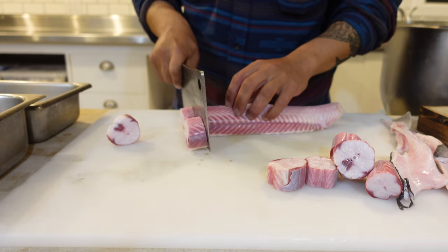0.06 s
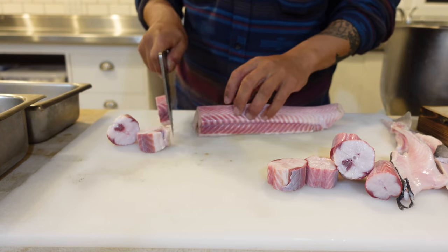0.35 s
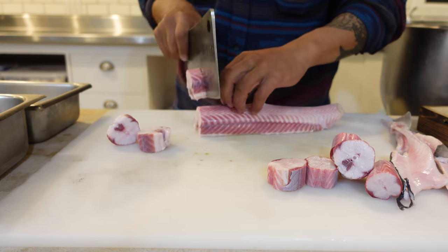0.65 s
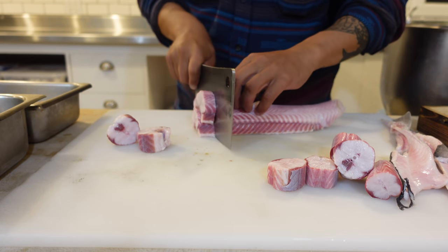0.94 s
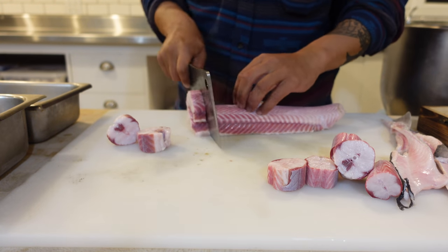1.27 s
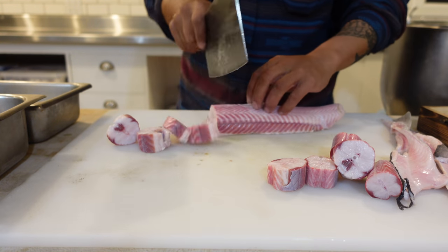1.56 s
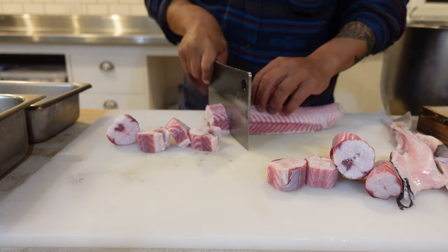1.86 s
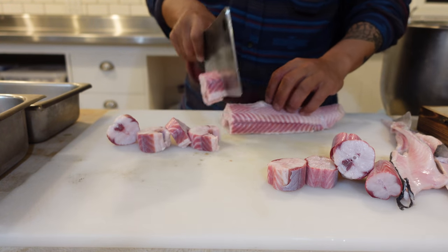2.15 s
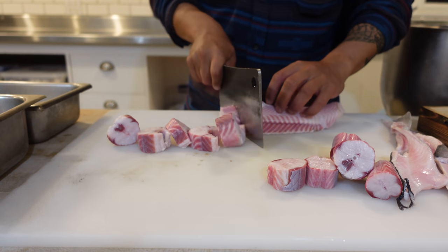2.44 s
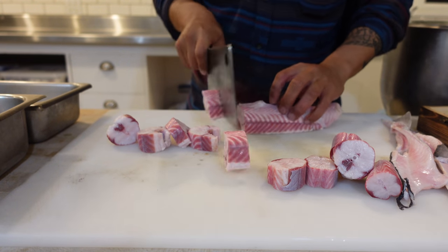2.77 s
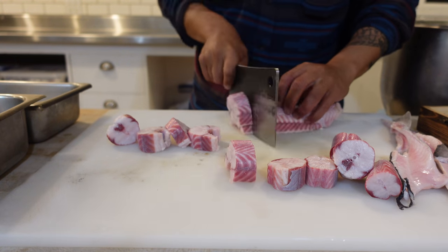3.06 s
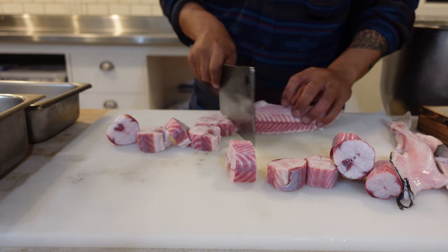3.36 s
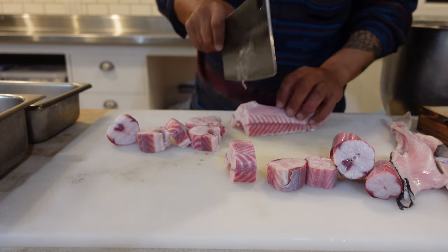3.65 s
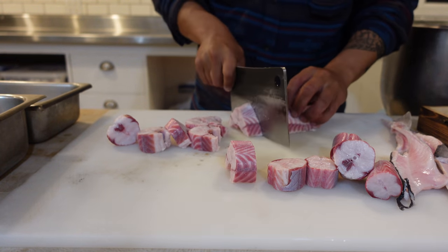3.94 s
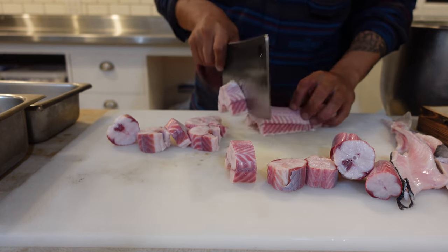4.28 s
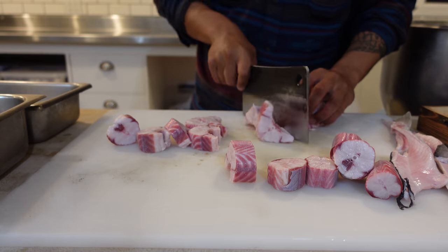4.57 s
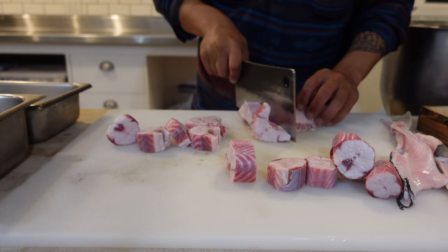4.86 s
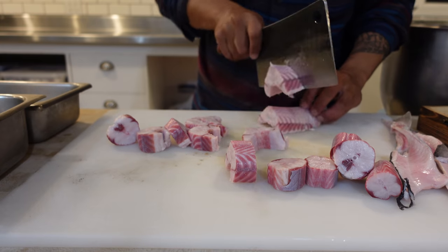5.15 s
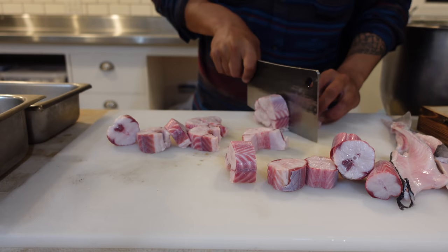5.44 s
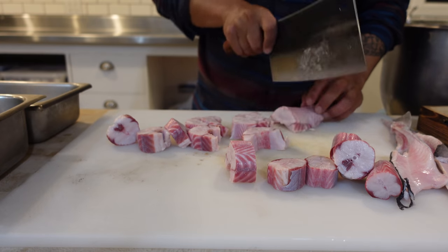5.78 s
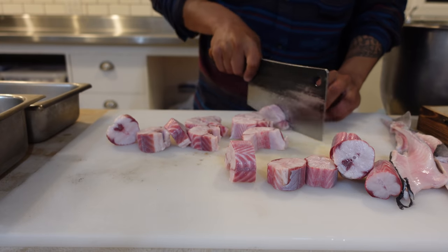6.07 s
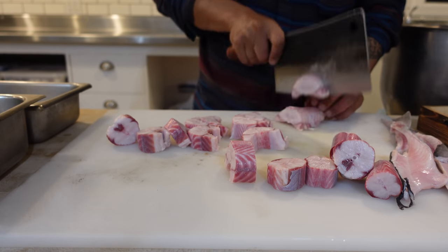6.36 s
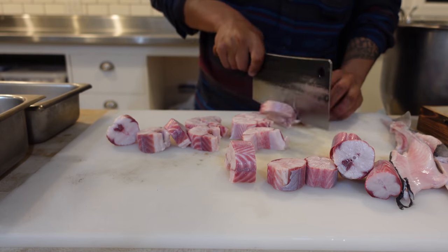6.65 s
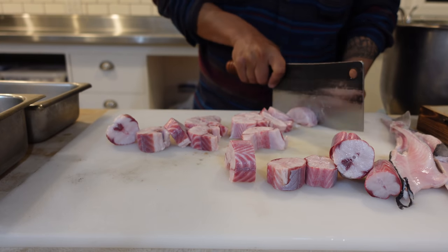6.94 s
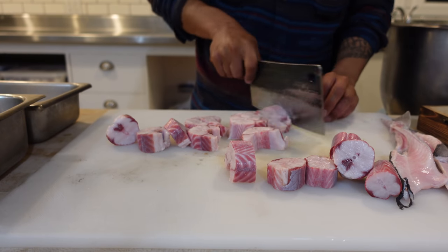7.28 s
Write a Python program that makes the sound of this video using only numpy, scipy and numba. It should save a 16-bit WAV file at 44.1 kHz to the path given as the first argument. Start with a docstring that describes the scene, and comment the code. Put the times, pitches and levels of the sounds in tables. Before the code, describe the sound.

Close, steady cleaver chops crunch through fish and knock on a cutting board, with faint blade scrapes and a low kitchen fan.

```python
"""Chopping a fish in a kitchen

Close to a plastic board in a hard-walled kitchen, a fan running behind. A heavy steel cleaver works
along a long fish: each chop slices the flesh, snaps the spine and slams into the board. Now and then
the blade scrapes free and rings, and once a wet piece drops. The blows overload the microphone,
whose limiter ducks and recovers while the room is still ringing."""
import sys
import numpy as np
from scipy import signal
from scipy.fft import rfft, irfft
from scipy.io import wavfile
from scipy.ndimage import map_coordinates
from numba import njit

SR = 44100
rng = np.random.default_rng(int(sys.argv[2]) if len(sys.argv) > 2 else 0)


def inscribe(sig):
    """Save sig as 16-bit PCM at rate SR to the path in sys.argv[1].

    A 1-D sig is mono; a 2-D sig holds one channel per row.
    Samples are clipped to [-1, 1] before scaling.
    """
    pcm = np.round(np.clip(np.atleast_2d(sig).T, -1, 1) * 32767)
    wavfile.write(sys.argv[1], SR, pcm.astype(np.int16))


N = 331191
LEAD = SR // 4  # samples of run-up, so that an earlier chop still rings at the start
T = np.arange(SR) / SR  # seconds since a contact


def amp(db):
    """Decibels to gain."""
    return 10 ** (np.asarray(db) / 20)


def unit(x):
    """Scale to rms 1."""
    return x / np.sqrt(np.mean(x ** 2) + 1e-20)


def along(points, hz):
    """Read (freq_hz, value) points on a log frequency axis."""
    freqs, values = np.transpose(points)
    return np.interp(np.log(hz + 1), np.log(freqs), values)


def rise(seconds):
    """A soft start."""
    return 1 - np.exp(-T / seconds)


def fade(t60):
    """A decay that loses 60 dB in t60 seconds."""
    return np.exp(-np.log(1000) * T / t60)


def wobble(rate, size=SR):
    """A smooth random curve, rate knots a second."""
    return map_coordinates(rng.standard_normal(size // 8), [np.arange(size) * rate / SR], mode="mirror")


def noise(spectrum, size=SR):
    """Coloured noise of rms 1."""
    colour = amp(along(spectrum, np.fft.rfftfreq(size, 1 / SR)))
    return unit(irfft(rfft(rng.standard_normal(size)) * colour, size))


def burst(spectrum, envelope):
    """A brief dense crackle that follows the envelope and fills its spectrum evenly."""
    phase = np.angle(rfft(rng.standard_normal(SR) * envelope))
    colour = amp(along(spectrum, np.fft.rfftfreq(SR, 1 / SR)))
    crackle = irfft(np.exp(1j * phase) * colour, SR)
    crackle *= envelope > envelope.max() / 1000
    return unit(crackle) * np.sqrt(np.mean(envelope ** 2))


def ring(modes):
    """Damped modes, struck at slightly new strengths each time."""
    return sum(amp(db + rng.standard_normal()) * np.sin(2 * np.pi * hz * T) * fade(t60)
               for hz, db, t60 in modes)


def leaning(rows, centre_hz, slope_db):
    """Weaken modes or bands by slope_db for each octave away from the pitch that a contact favours."""
    return [(hz, db - slope_db * abs(np.log2(hz / centre_hz)), *rest) for hz, db, *rest in rows]


def add(track, start_s, sound):
    """Mix a sound into a track that begins with the run-up."""
    part = track[max(LEAD + round(start_s * SR), 0):][:len(sound)]
    part += sound[:len(part)]


# The fan's air, in the background: freq_hz, relative_db
FAN_AIR = [(15, -61), (25, -22), (64, -19.5), (77, -15.5), (140, -7), (240, -3.5), (359, -10), (389, -6),
           (433, -15), (567, -12), (848, -15.5), (1080, -19.5), (1450, -22), (1900, -24), (15500, -49)]
# Its motor: pitch_hz, relative_db
FAN_HUM = [(118.4, -53.5), (156.1, -47.5), (242.2, -56.5), (333.8, -52.5), (382.2, -52.5)]

def fan():
    """Steady ventilation: rushing air and a wavering motor hum."""
    t = np.arange(N) / SR
    hum = sum(amp(db + 0.5) * np.sin(2 * np.pi * hz * t + 0.92 * wobble(3.7, size=N))
              for hz, db in FAN_HUM)
    air = amp(-42 + 0.14 * wobble(5.4, size=N)) * noise(FAN_AIR, size=N)
    return hum + air


# How long the hard walls ring: freq_hz, t60_s
WALL_DECAY = [(60, 0.38), (300, 0.52), (800, 0.53), (3000, 0.59), (5500, 0.63), (8000, 0.5), (14000, 0.41)]
# The colour they send back to the microphone: freq_hz, relative_db
WALL_COLOUR = [(40, 8), (150, 7.5), (400, 6.5), (800, 0.5), (2000, 2), (4000, -1.5), (6500, -4),
               (10000, -4), (15000, -9)]

def wall_reflections():
    """Dense reflections that build up, each frequency dying at its own speed."""
    hz, t, bands = signal.stft(rng.standard_normal(SR), SR, nperseg=512)
    dying = np.exp(-np.log(1000) * t / along(WALL_DECAY, hz)[:, None])
    colour = amp(along(WALL_COLOUR, hz))[:, None]
    _, tail = signal.istft(bands * dying * colour, SR, nperseg=512)
    return tail[:SR] * rise(0.028)


# Standing waves of the kitchen, where the microphone stands: pitch_hz, relative_db, t60_s
ROOM_MODES = [(88.3, 1, 0.51), (130.2, 7, 0.63), (268.7, -0.5, 0.49), (322, 0.5, 0.79), (391.4, -1.5, 0.62)]

def kitchen(x, diffuse_db, standing_db, spots=11):
    """Standing waves stay put; the reflections change as the cleaver works along the fish."""
    standing = amp(standing_db) * ring(ROOM_MODES) * rise(0.0043)
    place = np.linspace(0, spots - 1, len(x))
    diffuse = np.zeros(len(x))
    for spot in range(spots):
        nearness = np.sqrt(np.maximum(1 - np.abs(place - spot), 0))
        diffuse += signal.fftconvolve(x * nearness, wall_reflections())[:len(x)]
    return amp(diffuse_db) * diffuse + signal.fftconvolve(x, standing)[:len(x)]


# Flesh under pressure: freq_hz, relative_db
SQUASH_SPECTRUM = [(25, 1), (80, -9), (200, -4.5), (550, -12), (1500, -19), (8000, -77)]

def squash():
    """The dull noise of soft flesh giving way."""
    return noise(SQUASH_SPECTRUM)


# A wet surface making contact: freq_hz, relative_db
SMACK_SPECTRUM = [(1000, -17), (7000, -28), (10300, -4), (12000, -17), (16000, -16)]
# A piece falls off the blade, faint at the microphone: start_s, pat_db, smack_db
FALLING_PIECES = [(1.607, -38, -48)]

def drops():
    """A wet piece lands with a soft pat and a tiny smack."""
    track = np.zeros(LEAD + N)
    for start_s, pat_db, smack_db in FALLING_PIECES:
        pat = amp(pat_db) * squash() * fade(t60=0.074)
        smack = amp(smack_db) * burst(SMACK_SPECTRUM, fade(t60=0.025))
        add(track, start_s, pat + smack)
    return track


# Steel rubbing on plastic: freq_hz, relative_db
RUB_SPECTRUM = [(300, -31), (820, 21.5), (1100, 6), (1450, 13), (2150, 3), (2700, 0), (3450, 1),
                (6000, -12), (9000, -19.5), (15000, -40)]
# The blade in free air: pitch_hz, relative_db, t60_s
FREE_BLADE_MODES = [(3460, 1, 0.1), (4270, -7, 0.23), (4670, 0, .05), (5430, -2, 0.038), (7400, -2.5, 0.07),
                    (9000, -12, .06)]
# Scrapes across the board: middle_s, length_s, rub_db, ring_db, favoured_hz
BLADE_SCRAPES = [(1.342, 0.037, -34, -36.5, 4170), (2.675, .027, -31.5, -39, 8500),
                 (3.38, 0.025, -32.5, -42, 8500), (4.55, 0.014, -32, -62, 3500),
                 (7.266, .05, -36.5, -30.5, 7100), (7.465, 0.019, -52, -46, 5500)]

def scrapes():
    """Friction on the edge swells and stops, and the free steel sings on briefly."""
    track = np.zeros(LEAD + N)
    for middle_s, length_s, rub_db, ring_db, favoured_hz in BLADE_SCRAPES:
        stroke = np.sin(np.pi * np.minimum(T / length_s, 1)) ** 2
        steel = ring(leaning(FREE_BLADE_MODES, favoured_hz, slope_db=3)) * rise(0.0075)
        flicker = unit(amp(4 * wobble(500)))
        add(track, middle_s - length_s / 2, amp(rub_db) * burst(RUB_SPECTRUM, stroke))
        add(track, middle_s - length_s / 4, amp(ring_db) * steel * flicker)
    return track


# Splintering bone: freq_hz, relative_db
BONE_SPECTRUM = [(100, -30), (900, 9.5), (2000, 5), (4000, -3), (7000, -3.5), (10000, -10.5), (16000, -22)]
# The blade's edge, jarred by bone: pitch_hz, relative_db, t60_s
EDGE_MODES = [(3410, -12, .03), (5800, -20, .023), (6750, -16, .026), (7650, -16, .026), (10400, -25, .025)]

def bone_snap(level_db, t60, favoured_hz):
    """A bone gives way in tiny cracks, and each one jars the edge."""
    cracking = unit(amp(4.9 * wobble(1200)))
    splinters = burst(leaning(BONE_SPECTRUM, favoured_hz, slope_db=4), cracking * fade(t60))
    edge = cracking * ring(leaning(EDGE_MODES, favoured_hz, slope_db=2.5))
    return amp(level_db) * (splinters + edge) * rise(0.0027)


# Wet fibres tearing: freq_hz, relative_db
FIBRE_SPECTRUM = [(100, -15), (400, 30.5), (1000, 21), (1800, 15), (3200, 17), (6000, 6.5), (10000, -1),
                  (16000, -25)]
# The blade, damped by flesh: pitch_hz, relative_db, t60_s
BURIED_BLADE_MODES = [(763, -3, 0.16), (1485, -32, 0.055), (3490, -26, .05)]

def flesh_cut(chop, cut_s):
    """Flesh squashes, wet fibres tear and the buried blade hums until it meets the board."""
    depth = T / cut_s
    bite = np.minimum(T / 0.0036, 1)
    drag = bite * np.interp(depth, [0.37, 1], [1, 0.59], right=0)  # eases deeper in, stops at the board
    fibres = amp(-25.5) * burst(FIBRE_SPECTRUM, drag * unit(amp(2.2 * wobble(510))))
    push = amp(-18) * squash() * drag * np.minimum(2 * depth, 1)
    blade_db = -7 - 2.5 * chop  # hums most in the thick end of the fish
    blade = amp(blade_db) * ring(BURIED_BLADE_MODES) * drag * rise(0.0014)
    return fibres + push + blade


# The plastic board bending, close to the microphone: pitch_hz, relative_db, t60_s
BOARD_MODES = [(395.6, -6.5, 0.028), (537.5, 0, 0.019), (691.5, 0.5, 0.016), (797.4, -6, 0.026),
               (993, -13.5, 0.025)]
# The counter under it: pitch_hz, relative_db, t60_s
COUNTER_MODES = [(115, -25.5, 0.043), (227, -1.5, 0.018), (269.3, -8, 0.048), (336.3, -4, 0.039)]
# Steel striking plastic: freq_hz, relative_db
CRACK_SPECTRUM = [(40, -34.5), (150, 0.5), (500, 7.5), (950, 6.5), (1250, -3), (1700, -3.5), (2400, -11),
                  (3500, -9), (5500, -18.5), (8000, -32.5), (15000, -78.5)]

def board_blow(chop, thock_hz, crack_db):
    """The contact cracks, the counter thumps, and the spot struck picks which board modes sound."""
    thock_db = 7.5 + 1.2245 * chop  # towards the thin tail, less flesh cushions the blow
    thump_db = 8 - chop
    thock = amp(thock_db) * ring(leaning(BOARD_MODES, thock_hz, slope_db=12)) * rise(0.00078)
    thump = amp(thump_db) * ring(COUNTER_MODES) * rise(0.002)
    crack = amp(crack_db) * burst(CRACK_SPECTRUM, fade(t60=0.023) * rise(0.00035))
    return crack - thock - thump  # board and counter are pushed down first


# Small bones clipped on the way in: start_s, level_db
RIB_SNAPS = [(3.9, -5), (5.9004, -19)]
# The chops in the foreground, from the thick end of the fish to the tail:
# impact_s, force_db, thock_hz, crack_db, cut_s, spine_depth_fraction, flesh_db
CLEAVER_CHOPS = [(-.115, 2.5, 700, 7.5, 0.053, 0.1, 9), (.9715, -7, 610, -3.5, .049, .28, 3.5),
                 (1.7537, 1, 1180, 5, 0.033, 0.42, 0), (2.4245, 0, 680, 7.5, 0.027, 0.66, 2),
                 (3.1185, .5, 670, 4.5, 0.033, 0.52, -1.5), (3.9315, 3, 648, 4.5, 0.027, 0.14, -4),
                 (4.6256, 2, 613, 6, .0245, .58, -1.5), (5.3078, 1.5, 410, -3, .0245, 0.7, -1.5),
                 (5.916, -1, 593, 11, .018, 0.62, 6.5), (6.4677, -4, 508, 10, 0.015, 0.68, 1.5),
                 (6.991, -1.5, 595, 8.5, 0.014, 0.43, 6)]

def cleaver():
    """Each stroke cuts through flesh and spine, then hits the board. Returns board and fish tracks."""
    board, fish = np.zeros((2, LEAD + N))
    usual_cut_s = 0.018
    for chop, (impact_s, force_db, thock_hz, crack_db, *_) in enumerate(CLEAVER_CHOPS):
        add(board, impact_s, amp(force_db) * board_blow(chop, thock_hz, crack_db))
    for chop, (impact_s, *_, cut_s, spine_depth, flesh_db) in enumerate(CLEAVER_CHOPS):
        add(fish, impact_s - cut_s, amp(flesh_db) * flesh_cut(chop, cut_s))
        slowness = np.log2(cut_s / usual_cut_s)  # a slower cut splinters finer: softer and brighter
        spine = bone_snap(level_db=-8 - slowness, t60=0.023, favoured_hz=4100 * 2 ** (0.77 * slowness))
        add(fish, impact_s - cut_s * (1 - spine_depth), spine)
    for start_s, level_db in RIB_SNAPS:
        add(fish, start_s, bone_snap(level_db, t60=0.025, favoured_hz=2200))
    return board, fish


def scene():
    """The cleaver and its echo over the fan; the microphone rolls off the chopping's deepest bass."""
    board, fish = cleaver()
    handling = scrapes() + drops()
    into_room = board + amp(-5.5) * fish + amp(-7) * handling  # the board throws the most sound
    echo = kitchen(into_room, diffuse_db=-32.5, standing_db=-59)
    low_cut = signal.butter(2, 74, "high", fs=SR, output="sos")
    chopping = signal.sosfilt(low_cut, board + fish + handling + echo)
    return (chopping[LEAD:] + fan())[None]


@njit
def gain_reduction(excess_db, attack_s, release_s):
    """The limiter's cut in dB climbs quickly towards the excess level and relaxes slowly."""
    reduction_db = np.zeros(len(excess_db))
    held_db = 0.
    for i in range(len(excess_db)):
        lag_s = attack_s if excess_db[i] > held_db else release_s
        held_db += (excess_db[i] - held_db) / (lag_s * SR)
        reduction_db[i] = held_db
    return reduction_db


def record(dry):
    """The microphone's limiter is too slow for a blow's first cycles, which clip; the top is cut off."""
    threshold_db, top_hz = -4, 15900
    level_db = 20 * np.log10(np.abs(dry[0]) + 1e-9)
    excess_db = np.maximum(level_db - threshold_db, 0)
    limited = dry[0] * amp(-gain_reduction(excess_db, attack_s=0.0017, release_s=0.044))
    clipped = np.clip(limited, -1, 1)
    return signal.fftconvolve(clipped, signal.firwin(255, top_hz, fs=SR), "same")[None]


dry = scene()
out = record(dry)
inscribe(out)
```